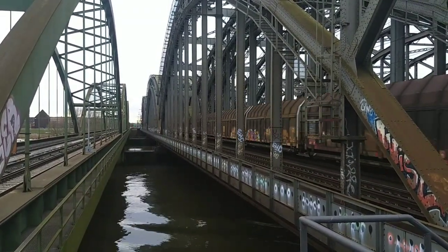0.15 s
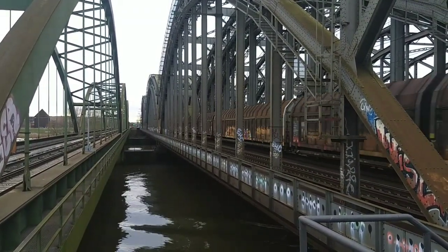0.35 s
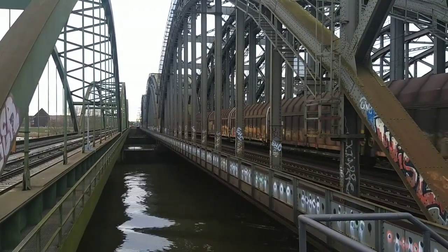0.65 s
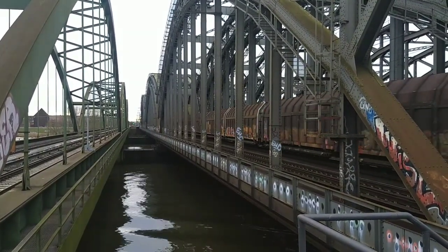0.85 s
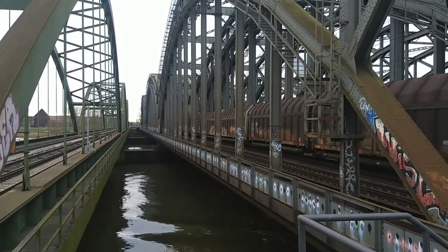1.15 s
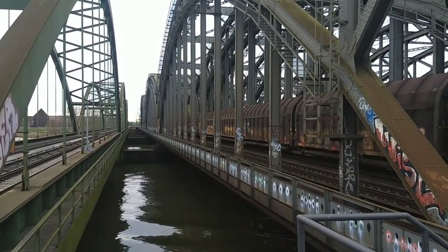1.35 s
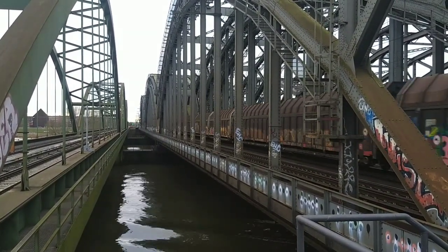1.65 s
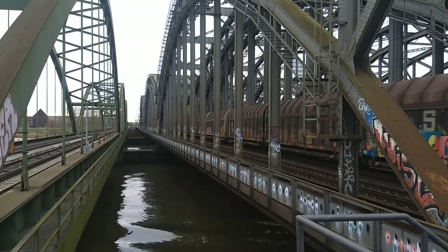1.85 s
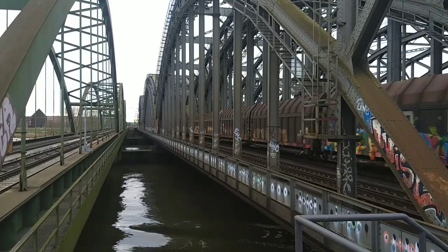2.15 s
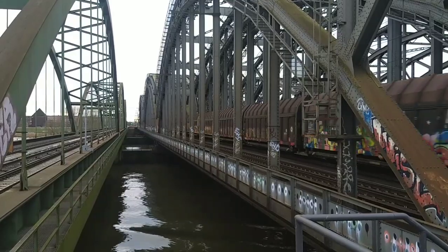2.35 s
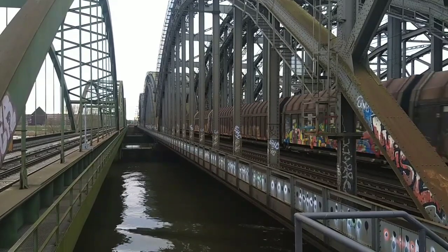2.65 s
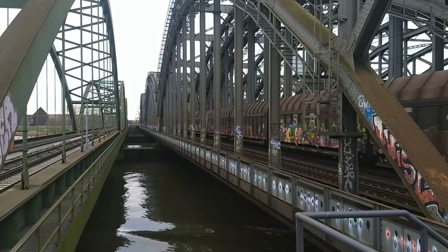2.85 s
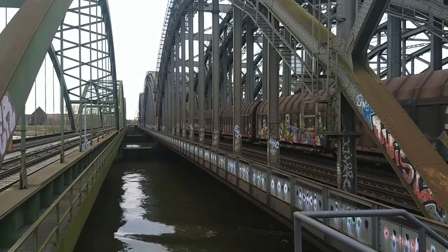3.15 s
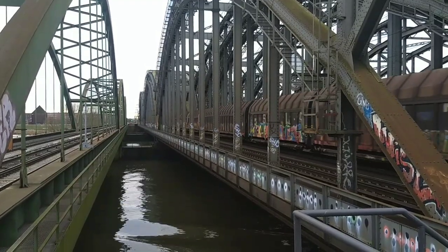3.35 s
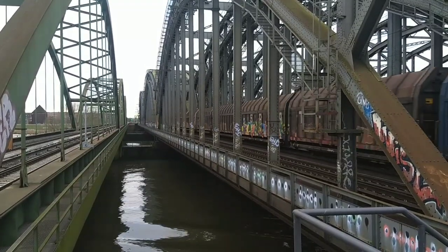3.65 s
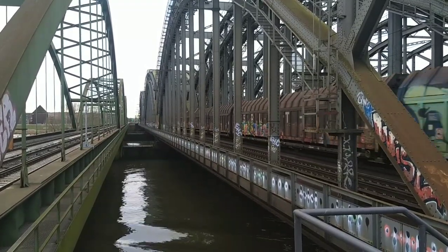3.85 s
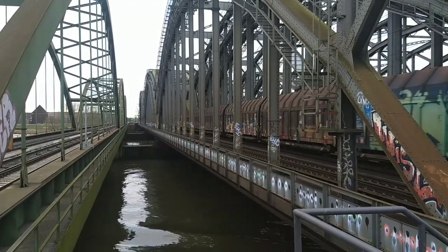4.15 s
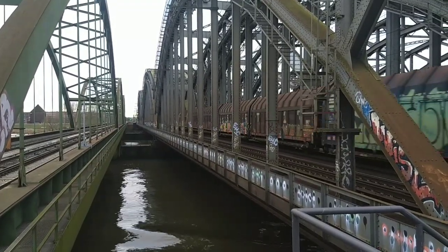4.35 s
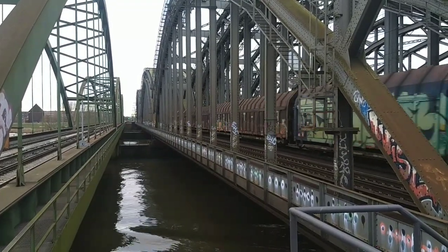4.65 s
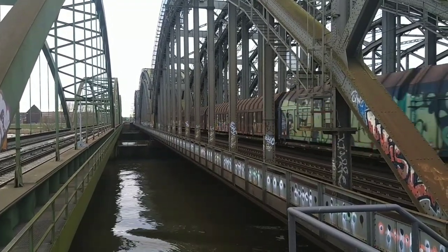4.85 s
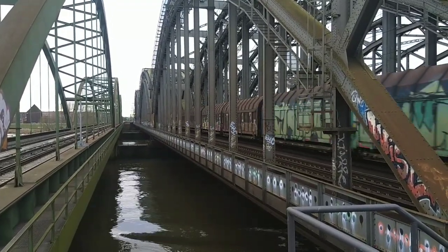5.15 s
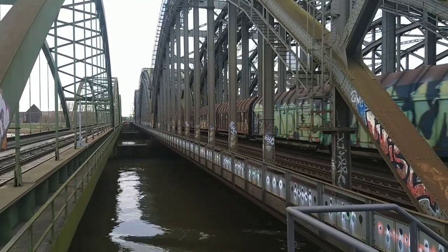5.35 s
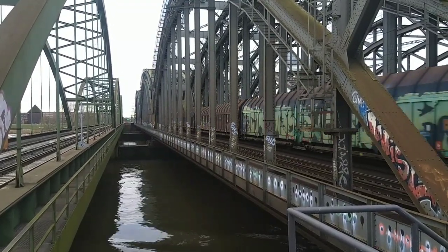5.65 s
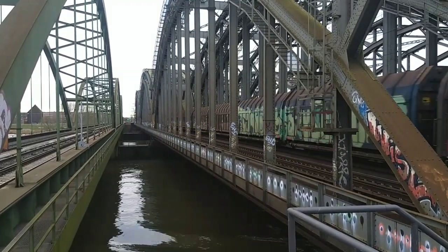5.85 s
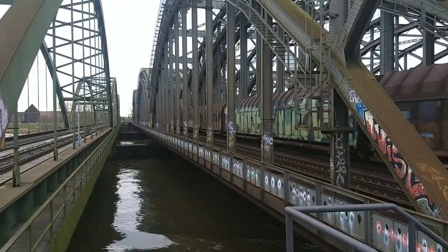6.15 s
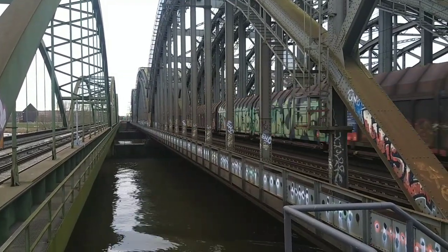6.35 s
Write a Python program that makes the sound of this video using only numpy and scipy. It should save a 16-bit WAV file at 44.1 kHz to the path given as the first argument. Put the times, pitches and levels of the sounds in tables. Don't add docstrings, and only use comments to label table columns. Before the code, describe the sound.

Heavy freight wagons roll past on an iron railway bridge, girders roaring continuously while wheels clatter, ring and hiss and loose steel clanks.

```python
import sys
import numpy as np
from scipy import signal
from scipy.fft import rfft, irfft, next_fast_len
from scipy.io import wavfile

SR = 44100
rng = np.random.default_rng(int(sys.argv[2]) if len(sys.argv) > 2 else 0)


def digitize_waveform(pressure):
    field = np.atleast_2d(pressure).T
    bounded = np.clip(field, -1, 1)
    quanta = np.round(bounded * 32767).astype(np.int16)
    wavfile.write(sys.argv[1], SR, quanta)


def invert_db(level):
    return 10 ** (np.asarray(level, dtype=float) / 20)


N = 287091
MARGIN = 2048

# time_s, rolling_load_db, wheel_roughness_db, deck_flexing_db
TRAIN = [(0, -2.5, 1.5, 1), (.45, 0, 0, 3.5), (.75, -1.6, -0.5, -1.5), (1.1, -0.1, -0.5, 1),
         (1.6, -0.2, 1.5, 0.5), (1.95, 0, 1.5, 0.5), (2.25, -0.5, 2.7, -0.5), (3.0, 0, 1.3, 0),
         (3.3, -.7, 2, -2), (3.75, 1, 1.5, 0), (4.2, 0.64, 0.2, .5), (4.55, 0, 0.8, -0.5),
         (5.1, 0.5, 1.5, 2), (5.5, 0.76, 1, -1.5), (5.95, 0.5, 2.4, 0.5), (6.51, 1, 0.5, -2)]


def in_time(rows):
    time_s, *columns = np.transpose(rows)
    return [np.interp(np.arange(N) / SR, time_s, c) for c in columns]


def at_hz(rows, size):
    hz, *columns = np.transpose(rows)
    log_bin_hz = np.log(np.arange(1, size // 2 + 2) * SR / size)
    return [np.interp(log_bin_hz, np.log(hz), c) for c in columns]


def drift(rate_hz):
    hop = 40
    r = np.exp(-2 * np.pi * rate_hz * hop / SR)
    noise = rng.standard_normal(N // hop + 2002)
    slow = signal.lfilter([1], [1, -2 * r, r * r], noise)[2000:]
    return np.interp(np.arange(N) / hop, np.arange(len(slow)), slow / slow.std())


def coloured(x, spectrum):
    size = next_fast_len(N)
    gain = invert_db(at_hz(spectrum, size)[0]) * np.sqrt(SR / 2)
    return irfft(rfft(x, size) * gain, size)[..., :N]


def resonance(x, hz, width_hz):
    r = np.exp(-np.pi * width_hz / SR)
    poles = [1, -2 * r * np.cos(2 * np.pi * hz / SR), r * r]
    return signal.lfilter([(1 - r * r) / 2, 0, (r * r - 1) / 2], poles, x)


def shaken(level_db, spectrum, modes, swell_db, swell_hz, blows=0):
    rough = rng.standard_normal((2, N)) * (1 + blows)
    out = rough.copy()
    for hz, width_hz, over_db in modes:
        swell = invert_db(over_db + swell_db * drift(swell_hz))
        out += swell * resonance(rough, hz, width_hz)
    return coloured(out * invert_db(level_db - np.mean(level_db)), spectrum)


def bursts(events, gain_db, rise_s, t60_s):
    time_s, peak_db = np.transpose(events)
    clicks = np.zeros(N)
    clicks[(time_s * SR).astype(int)] = invert_db(peak_db - np.mean(peak_db) + gain_db)
    fall = invert_db(-60 / (t60_s * SR))
    rise = np.exp(-1 / (rise_s * SR))
    dying = signal.lfilter([1], [1, -fall], clicks + 1e-18)
    return signal.lfilter([1 - rise], [1, -rise], dying)


def sweeps():
    # time_s, change_db
    bogies = [(.08, 1), (.23, 1), (.31, -2), (.46, 0), (.66, -2), (.97, 1), (1.05, -2), (1.62, 3),
              (1.72, -1), (1.89, -3), (2.05, 0.5), (2.2, 1.5), (2.47, -0.5), (2.62, 1), (2.75, -1.8),
              (3.12, -2), (3.3, -0.5), (3.92, 0.5), (4.04, -0.5), (4.35, 1), (4.44, -2.5), (4.57, -0.5),
              (4.67, -2.5), (4.8, 1), (4.98, -3.5), (5.22, -1.5), (5.35, 0), (5.9, 1), (6.16, -2.5),
              (6.29, 0.5)]
    width_s, hop = 0.023, 64
    time_s, change_db = np.transpose(bogies)
    t = np.arange(0, N + hop, hop) / SR
    bells = np.exp(-.5 * ((t - time_s[:, None]) / width_s) ** 2)
    return np.interp(np.arange(N) / SR, t, change_db @ bells)


def flange_hiss(load_db, rough_db, gusts):
    # hz, level_db_per_hz
    flange = [(8000, -120), (9500, -99), (11000, -102), (12300, -107), (13500, -111), (14400, -114),
              (14900, -111), (15150, -111), (15250, -115), (16500, -114)]
    # hz, width_hz, over_noise_db
    flange_modes = [(11820, 50, 3), (12995, 16, 9), (15420, 16, 6)]
    level_db = .7 * load_db + 1.9 * rough_db + .6 * drift(10.5) + .4 * gusts
    return shaken(level_db, flange, flange_modes, swell_db=2, swell_hz=2.5)


def contact_hiss(load_db, rough_db, gusts, clanks):
    # hz, level_db_per_hz
    contact = [(3000, -79), (4400, -85.5), (4900, -82.5), (5600, -81), (6500, -81.5), (7500, -85.5),
               (8700, -97), (9200, -96), (10500, -112), (12000, -130), (14000, -160)]
    # hz, width_hz, over_noise_db
    contact_modes = [(8120, 80, -2), (8620, 120, 5.5)]
    level_db = 1.2 * load_db + rough_db + 0.6 * gusts
    return shaken(level_db, contact, contact_modes, swell_db=0, swell_hz=2.3, blows=0.29 * clanks)


def wheel_ring(load_db, rough_db, gusts, clanks):
    # hz, level_db_per_hz
    wheels = [(800, -61), (1350, -70), (1700, -62.5), (2000, -67.5), (2400, -65.5), (2800, -73.5),
              (3500, -75.5), (4300, -75.5), (5500, -99), (8000, -125), (12000, -160)]
    # hz, width_hz, over_noise_db
    wheel_modes = [(1580, 590, -6.5), (2250, 19, -18), (2366, 63, -7.5), (3096, 140, -6), (3830, 63, -3)]
    level_db = 1.16 * load_db + .1 * rough_db + .3 * gusts
    return shaken(level_db, wheels, wheel_modes, swell_db=2, swell_hz=7.5, blows=clanks)


def loose_steel():
    # start_s, peak_db
    clank_events = [(1.6327, -6.5), (1.7379, -13), (2.2293, -22), (2.3984, -18), (2.5805, -24),
                    (2.8384, -23), (2.9796, -17), (3.6681, -21), (3.8072, -43), (4.0831, -27),
                    (4.1819, -12), (4.2572, -9), (4.3281, -23), (4.5416, -14), (4.6414, -13), (4.796, -16),
                    (5.1946, -30), (5.3438, -10), (5.7962, -16), (6.117, -8)]
    return bursts(clank_events, gain_db=-16, rise_s=0.0013, t60_s=0.091)


def wagons():
    load_db, rough_db, _ = in_time(TRAIN)
    load_db = load_db + 0.77 * sweeps()
    clanks, gusts = loose_steel(), drift(8.1)
    hiss = flange_hiss(load_db, rough_db, gusts) + contact_hiss(load_db, rough_db, gusts, clanks)
    return hiss + wheel_ring(load_db, rough_db, gusts, clanks)


def deck_boom():
    # start_s, peak_db
    joints = [(0.473, -13), (1.114, -17), (1.272, -12), (1.886, 6), (2.987, 3), (3.162, 0), (3.64, -25),
              (4.332, -23), (4.533, 4), (4.907, -16), (5.989, -3), (6.341, -15)]
    # hz, level_db_per_hz
    deck = [(20, -59), (45, -57), (62, -44.5), (72, -48.5), (83, -43), (100, -50.5), (150, -41.5),
            (210, -46), (280, -52), (500, -114.5), (2000, -150)]
    _, _, flex_db = in_time(TRAIN)
    thuds = bursts(joints, gain_db=-20.5, rise_s=.008, t60_s=.4)
    return shaken(flex_db + .8 * drift(3.3), deck, [], swell_db=0, swell_hz=1, blows=thuds)


def girder_roar():
    # hz, level_db_per_hz
    girders = [(100, -61), (200, -47.5), (300, -42), (400, -47), (520, -53), (640, -48.5), (800, -53),
               (1000, -57), (1350, -67), (2000, -112), (5000, -150)]
    # hz, width_hz, over_noise_db
    girder_modes = [(263, 45, -12), (321.6, 21, -9), (366, 33, -10.5), (629, 180, -8), (777, 78, -8),
                    (882, 42, -13)]
    load_db, _, _ = in_time(TRAIN)
    return shaken(1.27 * load_db + .8 * sweeps(), girders, girder_modes, swell_db=2.0, swell_hz=4.2)


def spectra(x):
    size = next_fast_len(N + 2 * MARGIN)
    return rfft(np.pad(x, [(0, 0), (MARGIN, size - N - MARGIN)], mode="reflect")), size


def waveform(spectrum, size):
    return irfft(spectrum, size)[:, MARGIN:MARGIN + N]


def scene():
    # hz, level_db, in_step_share, quarter_cycle_share
    port_difference = [(30, -30, .0, 0), (100, -25, 0.1, -0.0062), (274, -20, -.05, 0.25),
                       (466, -8, -0.3, 0.12), (600, -10.5, .55, 0.088), (1000, -8.5, .42, .0),
                       (1350, 0.5, 0.2, 0.4), (1700, -3, 0.15, -0.35), (2700, -.6, 0.078, -.05),
                       (4200, -1, .65, 0.037), (5000, 2, 0.8, .0), (6500, -1.5, .7, -0.17),
                       (9000, 0.2, .7, .0), (15000, -0.5, .45, .0)]
    (first, second), size = spectra(wagons() + deck_boom() + girder_roar())
    level_db, in_step, quarter = at_hz(port_difference, size)
    shared = in_step + 1j * quarter
    unshared = np.sqrt(np.clip(1 - abs(shared) ** 2, 0, 1))
    difference = invert_db(level_db) * (shared * first + unshared * second)
    return waveform(np.array([first + difference, first - difference]), size)


def band_limit(x):
    return signal.sosfilt(signal.butter(12, 15700, fs=SR, output="sos"), x)


def record(dry):
    # hz, noise_db
    storage_noise = [(500, -40), (1150, -18), (1700, -14), (2300, -11), (2900, -14), (3450, -18),
                     (4300, -35), (13000, -30), (13700, -3), (15100, -2)]
    crossfeed, crossfeed_s = .995, 0.0004327
    ports, size = spectra(dry)
    bin_hz = np.arange(size // 2 + 1) * SR / size
    delay = np.exp(-2j * np.pi * bin_hz * crossfeed_s)
    steered = waveform(ports - crossfeed * delay * ports[::-1], size)
    error = waveform(invert_db(at_hz(storage_noise, size)[0]) * ports, size)
    scrambled = error * [drift(40), drift(37)]
    return band_limit(steered + scrambled)


dry = scene()
out = record(dry)
digitize_waveform(out)
```